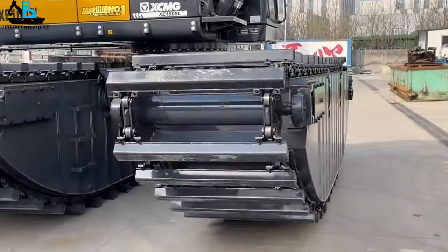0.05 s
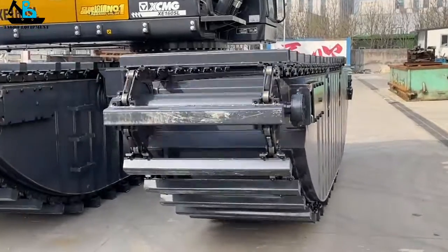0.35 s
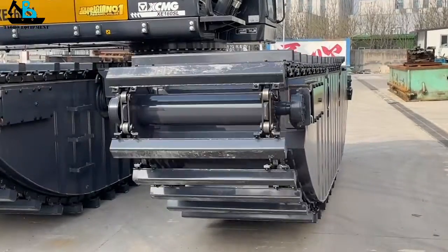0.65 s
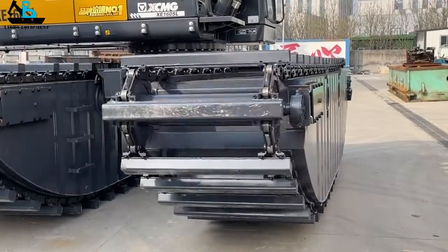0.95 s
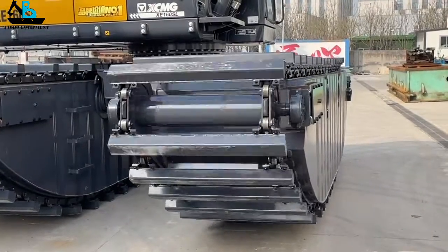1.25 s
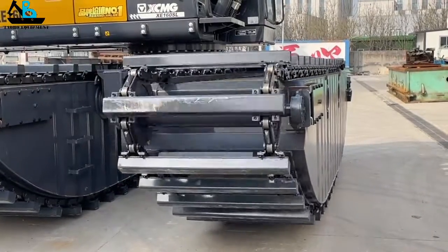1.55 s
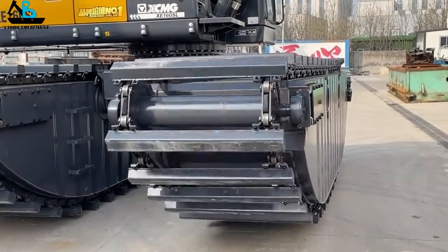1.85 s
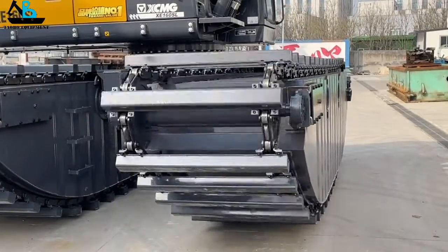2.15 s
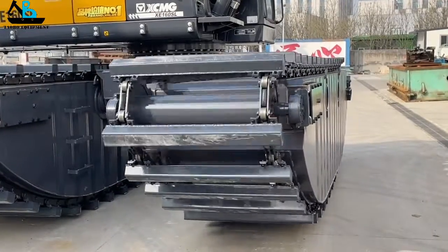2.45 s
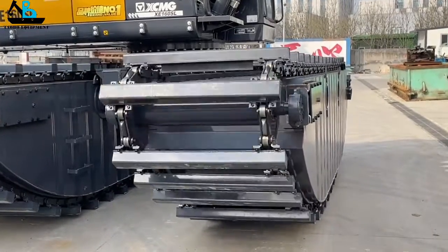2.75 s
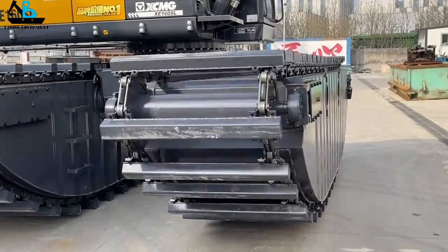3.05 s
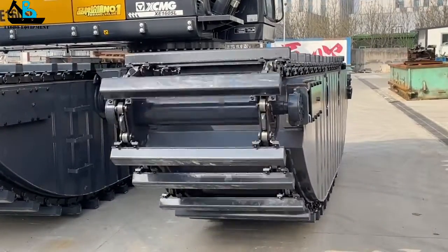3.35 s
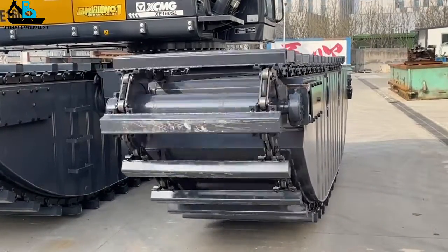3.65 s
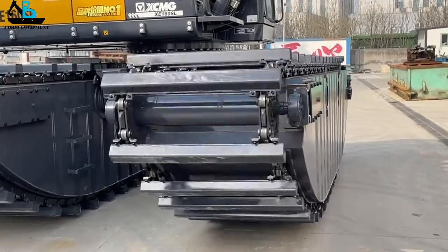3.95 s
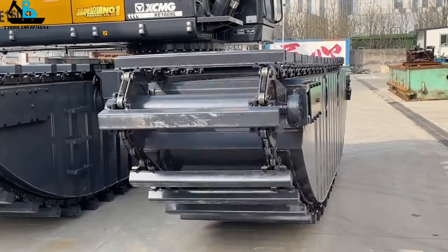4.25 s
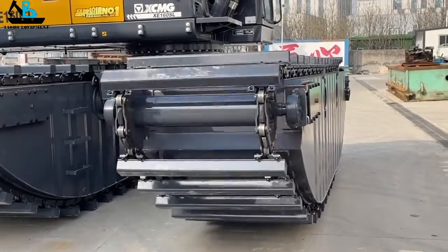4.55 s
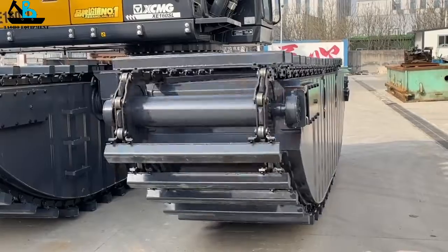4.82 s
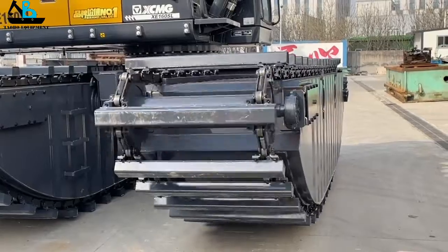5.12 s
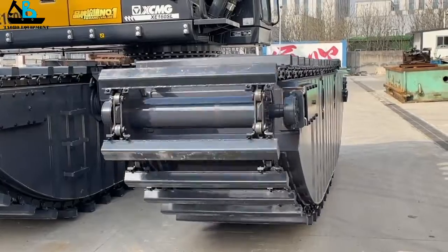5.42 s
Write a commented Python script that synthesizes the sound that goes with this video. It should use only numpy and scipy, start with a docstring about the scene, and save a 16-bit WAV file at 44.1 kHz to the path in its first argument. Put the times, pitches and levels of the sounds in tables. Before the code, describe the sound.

Steel track links clatter and clank continuously at close range, with hollow booms and a steady diesel engine underneath.

```python
"""Amphibious excavator on concrete

Heard from beside one pontoon track. The diesel drones at a steady speed under the rush of its fan.
Links and steel cleats clank over the sprocket about seven times a second, rattle and rasp along
their guides and make the hollow pontoon rumble and boom. Pins ring and squeak; grit cracks in the steel."""
import sys
import numpy as np
from scipy import signal
from scipy.fft import rfft, irfft, next_fast_len
from scipy.io import wavfile

SR = 44100
rng = np.random.default_rng(int(sys.argv[2]) if len(sys.argv) > 2 else 0)


def transcribe(u):
    """Save the signal u as a 16-bit wav file named by the first command-line argument.

    u: samples, shape (n,) or (channels, n), limited to [-1, 1]; the rate is SR.
    q: integer samples, one column per channel.
    """
    v = np.clip(np.atleast_2d(u).T, -1, 1)
    q = np.round(v * 32767).astype(np.int16)
    wavfile.write(sys.argv[1], SR, q)


N = 246078
TIME = np.arange(N) / SR


def from_db(db):
    return 10 ** (np.asarray(db) / 20)


def rms_one(x):
    return x / np.sqrt(np.mean(x ** 2) + 1e-20)


def in_time(curve):
    """A level curve, sample by sample."""
    return np.interp(TIME, *np.transpose(curve))


def at_hz(points, hz):
    """Read a table on a log-frequency axis."""
    freqs, values = np.transpose(points)
    return np.interp(np.log(hz), np.log(freqs), values)


def filtered(x, hz, kind, order=2):
    """Butterworth filter."""
    return signal.sosfilt(signal.butter(order, np.clip(hz, 10, .45 * SR), kind, fs=SR, output="sos"), x)


def add(out, s, sound):
    """Mix a sound in at time s."""
    start = int(np.clip(s * SR, 0, N - 1))
    out[..., start:start + sound.shape[-1]] += sound[..., :N - start]


def drift(rate_hz):
    """Smooth random modulation of spread 1."""
    pole = np.exp(-80 * np.pi * rate_hz / SR)
    slow = signal.lfilter([1], [1, -2 * pole, pole * pole], rng.standard_normal(N // 40 + 2002))[2000:]
    return np.interp(np.arange(N) / 40, np.arange(len(slow)), rms_one(slow))


def contacts(per_s, spread_db, size):
    """Random touches of uneven strength."""
    strength = from_db(spread_db * np.minimum(rng.exponential(1, size), 4))
    return (rng.random(size) < per_s / SR) * strength * rng.choice([-1, 1], size)


def ringing(modes, t, pitch=1):
    """Struck modes, tuned by pitch, die away; neighbours start in opposite directions."""
    return sum((-1) ** k * from_db(db - 60 * t / t60) * np.sin(2 * np.pi * pitch * f * t)
               for k, (f, db, t60) in enumerate(modes))


# Stereo width of the noise: f/Hz, side minus mid/dB
STEREO_WIDTH = [(60, -25), (250, -17), (700, -15), (1400, -11), (2500, -20), (4500, -24), (6500, -17),
                (10000, -14)]
def noise_bands(spectrum, size):
    """Stereo noise in bands of 0.4 octave across a spectrum: yields (Hz, band)."""
    edges = 28 * 2 ** np.arange(0, 9.3, .4)
    white = rng.standard_normal((2, 2, size + SR // 10))
    for k, (low, high) in enumerate(zip(edges, edges[1:])):
        if high > spectrum[0][0] and low < spectrum[-1][0]:
            hz = np.sqrt(low * high)
            mid, side = filtered(white[k % 2], [low, high], "band")[:, -size:]
            width = from_db(at_hz(STEREO_WIDTH, hz))
            yield hz, from_db(at_hz(spectrum, hz)) * (mid + width * side * [[1], [-1]])


def noise(spectrum):
    """Steady coloured noise of rms 1."""
    return rms_one(sum(band for hz, band in noise_bands(spectrum, N)))


# The low drone wavers in level: t/s, relative level/dB
DRONE_RIDE = [(0, -20.5), (.45, -18), (.82, -17.5), (1.0, -15), (1.2, -28), (1.32, -14.5), (1.6, -16),
              (1.88, -18.5), (2.05, -22), (2.25, -22), (2.4, -15), (2.8, -23), (3.05, -17), (3.3, -32),
              (3.55, -19.5), (3.72, -18.5), (3.98, -18), (4.2, -23), (4.5, -22), (4.66, -18), (4.85, -25),
              (5.1, -23), (5.58, -15.5)]
# Engine and pump tones above it: multiple of the crankshaft rate, level/dB
ENGINE_ORDERS = [(8, -38), (9, -34), (12, -34), (14, -34), (16, -33), (19.3, -35), (26.27, -35.5),
                 (28.4, -38)]
def diesel(firing_hz, firings_per_turn, gain_db, wander_hz, uneven_db):
    """The governed engine: a strong firing tone and weaker, unsteady orders; also gives its phase."""
    phase = 2 * np.pi * np.cumsum(firing_hz + wander_hz * drift(7.3)) / SR
    tone = from_db(in_time(DRONE_RIDE) + gain_db) * np.sin(phase)
    for multiple, db in ENGINE_ORDERS:
        level = from_db(db + uneven_db * drift(4.7))
        tone += level * np.sin(multiple * phase / firings_per_turn + rng.uniform(0, 2 * np.pi))
    return np.sqrt(2) * tone, phase


# Colour of the fan: f/Hz, density/dB
FAN_SPECTRUM = [(500, 25), (1000, -13), (1400, 17.5), (2200, 9.5), (3200, 4), (5000, -6), (7000, -55)]
def fan(firing_phase, level_db):
    """The engine bay's rush pulses a little with each firing."""
    return from_db(level_db) * noise(FAN_SPECTRUM) * (1 + 0.086 * np.cos(firing_phase))


CLEAT_PERIOD_S, FIRST_CLEAT_S, LINK_SHARE = .279, .245, 0.17
def chain_load(lead_s=0):
    """The pull on the chain peaks with each cleat; the link between two cleats adds a second harmonic."""
    turn = 2 * np.pi * (TIME + lead_s - FIRST_CLEAT_S) / CLEAT_PERIOD_S
    return np.cos(turn) + LINK_SHARE * np.cos(2 * turn)


# Colour of the pontoon's rumble: f/Hz, density/dB
RUMBLE_SPECTRUM = [(30, -30), (40, -24), (52, 5), (66, -4), (80, 2.5), (98, 2.5), (122, -3), (165, 3.5),
                   (230, -0.5), (320, -5.5), (480, -12), (800, -17), (1500, -23.5), (4000, -73)]
# It grows and eases: t/s, relative level/dB
RUMBLE_RIDE = [(0, -1), (.15, -1), (.3, -1), (1.1, 0), (1.6, -1.5), (1.95, -1), (2.6, -0.5), (3.1, -0.5),
               (3.95, 0.5), (4.17, 0), (4.27, -2.5), (4.55, -1.5), (4.72, -1), (4.88, -1), (5.0, -1.5),
               (5.17, -2), (5.3, -1.5), (5.58, -1.5)]
def pontoon_rumble(level_db, swing_db):
    """The running track keeps the hollow pontoon rumbling."""
    level = from_db(level_db + in_time(RUMBLE_RIDE) + swing_db * chain_load())
    return level * filtered(noise(RUMBLE_SPECTRUM), 41.4, "high", order=4)


# Colour of struck track steel: f/Hz, density/dB
STEEL_SPECTRUM = [(250, 14), (400, 3.5), (580, 4), (850, 5.5), (1200, -0.5), (1650, -0.5), (1950, 1),
                  (2700, -7), (3300, -8), (4300, -16.5), (6000, -17), (7500, -41), (10000, -10),
                  (15000, -20)]
# Its ring time: f/Hz, t60/s
STEEL_DECAY = [(300, 0.21), (1000, 0.12), (3000, 0.16), (6000, 0.21), (12000, 0.077)]
# Clear modes shared by cleats and pins: f/Hz, level/dB, t60/s
STEEL_MODES = [(533, -5, .35), (590, -7, .25), (790, -13, .15), (1260, -11, .12), (1470, -8, .08),
               (1830, -3, .045), (1930, -2, .04), (2610, -11, .08), (2854, -13, .12), (3305, -11.5, .1),
               (4537, -14, .16), (5140, -20, .15), (6320, -21, .05)]
def steel_ring(modes_db, clink_hz):
    """One track part, touched once: crowded plate modes, a few clear ones and a clink of its own."""
    t = TIME[:SR // 4]
    crowd = sum(band * from_db(-60 * t / at_hz(STEEL_DECAY, hz))
                for hz, band in noise_bands(STEEL_SPECTRUM, len(t)))
    clink = (clink_hz * (1 + .02 * rng.standard_normal()), 3 * rng.standard_normal(), .025)
    clear = sum(from_db(db - 60 * t / t60) * np.sin(2 * np.pi * hz * t) * rng.choice([-1, 1])
                for hz, db, t60 in STEEL_MODES + [clink])
    return rms_one(crowd) + from_db(modes_db) * clear


# The rattle comes and goes: t/s, relative level/dB
RATTLE_RIDE = [(0, 4), (.2, -2), (.8, 0), (1.15, -5.5), (1.45, -0.5), (2.15, -4), (2.6, -2.5), (3.1, 1.5),
               (3.7, -4.5), (4.35, -3.5), (5, 0), (5.58, 0.5)]
def chain_rattle(parts, level_db, swing_db):
    """Rollers and loose pins knock all along the chain, harder under load."""
    knocks, preroll = np.zeros((2, N)), SR // 4
    for part in parts:
        touches = contacts(per_s=160, spread_db=5, size=N + preroll)
        knocks += signal.fftconvolve(part, touches[None], axes=1)[:, preroll:N + preroll]
    level = from_db(level_db + in_time(RATTLE_RIDE) + swing_db * chain_load())
    return level * rms_one(filtered(filtered(knocks, 390, "high"), 6400, "low"))


# Friction of cleats on their guides: t/s, relative level/dB
SLIDE_RIDE = [(0, -0.5), (.8, 1), (1.2, 2), (1.6, 2.5), (2.2, 2.5), (2.9, 3), (3.7, 3.5), (4.12, 6),
              (4.25, -0.5), (4.55, 0), (4.75, 0.5), (5.2, 2.5), (5.58, 1)]
def sliding_db():
    """The cleats scrape hardest just before the load peaks."""
    return in_time(SLIDE_RIDE) + 1.5 * chain_load(lead_s=0.086)


# Colour of the sliding steel: f/Hz, density/dB
HISS_SPECTRUM = [(2500, 5), (4200, -17), (5400, 21), (6300, 0), (7500, -2), (9300, -20.5), (11500, -5.5),
                 (15500, -9)]
def guide_hiss(level_db, wander_db):
    """Sliding cleats hiss, unevenly from moment to moment."""
    return from_db(level_db + sliding_db() + wander_db * drift(40)) * noise(HISS_SPECTRUM)


# Pitches of the fine ticks: f/Hz, level/dB, t60/s
TICK_PITCHES = [(4540, -2, .03), (5140, 0, .02), (5750, 2, .008), (6320, 3, .012), (6900, 1, .005),
                (9900, -6, .003), (10650, -9, .015), (11540, -7, .008), (12400, -7, .003)]
def fine_ticks(level_db, per_s):
    """Fine, high, pitched ticks in the hiss."""
    ticks, t = np.zeros(N), TIME[:SR // 20]
    for mode in TICK_PITCHES:
        onsets = contacts(per_s / len(TICK_PITCHES), spread_db=2.5, size=N)
        ticks += signal.fftconvolve(onsets, ringing([mode], t))[:N]
    return from_db(level_db + sliding_db()) * rms_one(ticks)


# Slack cleats and links slam home: t/s, force/dB, hardness/dB, thud into the plate/dB, rattle decay/s
SLAMS = [(0.002, -32, -12, 12, 0.024), (0.055, -33.5, -14, 14, 0.015), (0.218, -31.5, -20, 12.5, 0.014),
         (0.254, -24.5, -3, -3, 0.026), (0.270, -28, 0.5, 5, 0.063), (0.358, -34.5, -27, 7, 0.02),
         (0.453, -30.5, -3, -8, 0.018), (0.490, -32.5, -2, -3, 0.018), (0.506, -30, 3, 1.5, 0.04),
         (0.642, -24, -4, 3.5, 0.04), (0.777, -30, -2, 7.5, 0.032), (1.009, -33, -0.5, -2, 0.03),
         (1.037, -28, -9, 4.5, .05), (1.200, -30, -4, -6, .009), (1.329, -27, -5, -13, 0.014),
         (1.423, -29, -1.5, 2, 0.035), (1.468, -31, -4, -16, 0.017), (1.575, -22.5, -1.5, -10, 0.006),
         (1.632, -29.5, -7, 6, 0.083), (1.851, -27, -3, 7.5, 0.2), (1.888, -21.5, 4.5, 1, 0.019),
         (1.906, -22.5, 3, -5, 0.024), (2.015, -29, -1, 6, 0.028), (2.182, -31, 1, -17, 0.024),
         (2.307, -28, 1, 8, 0.036), (2.460, -36.5, 7.5, -4, 0.028), (2.763, -29.5, -6, 10, 0.013),
         (2.860, -30.5, 2, 3, 0.056), (2.962, -37, -9, -2, .012), (3.017, -27.5, -10, 7.5, 0.068),
         (3.033, -24.5, 5, 5, 0.027), (3.130, -32, 5, 6, 0.066), (3.245, -32.5, -2, -4, 0.06),
         (3.318, -25, -3.5, 2, 0.033), (3.422, -30.5, -1.5, -5, 0.039), (3.479, -29.5, -4, -8, 0.0053),
         (3.573, -23, -0.5, -1.5, 0.059), (3.598, -23, 0, 2.5, 0.071), (3.784, -28, -2, 5, 0.016),
         (3.845, -34, 4, 11.5, 0.053), (4.038, -30, -9, 4, 0.033), (4.136, -27.5, -4, 0, 0.027),
         (4.150, -26.5, 6.5, -9, 0.012), (4.157, -21.5, -3, 6, 0.024), (4.176, -27.5, -10, 8, 0.02),
         (4.408, -28, 1, 11.5, 0.029), (4.695, -26.5, -4, 3, 0.014), (4.709, -28.5, -4, 8, 0.053),
         (4.865, -26.5, 1.5, 1, .014), (4.958, -25, -1, 0, 0.044), (4.996, -27.5, -6, 6.5, 0.037),
         (5.105, -31, -8, -6, 0.02), (5.195, -33, -1, 12, 0.024), (5.226, -30.5, 1.5, -4, 0.019),
         (5.368, -34, 6.5, -6, 0.037), (5.555, -30, -2.5, -5.5, .03)]
# Plate, cleat, link and pin registers: low/Hz, high/Hz, share of hardness, of thud, of heaviness
BLOW_REGISTERS = [(330, 750, 0, 1, .7), (750, 1300, -.5, 0, 2), (1300, 3700, 0, 0, 0),
                  (3700, 6800, 1, 0, 0)]
# How each register answers: level/dB, factor on the rattle decay
REGISTER_RESPONSES = [(-4, 2.1), (-2, 1.58), (1.06, 0.74), (-8, 0.47)]
def clanks(parts, seats, bounce_db):
    """Slams and seating knocks bounce and die; a hard blow rings the pin, a heavy one the cleat."""
    out, t = np.zeros((2, N)), TIME[:SR // 5]
    registers = [[filtered(part, [low, high], "band", order=3) for low, high, *_ in BLOW_REGISTERS]
                 for part in parts]
    for k, (s, force_db, hardness_db, thud_db, rattle_s) in enumerate(SLAMS + seats):
        bounces = from_db(bounce_db) * contacts(per_s=1000, spread_db=2.5, size=len(t))
        heaviness_db = 0.24 * max(force_db + 28.5, 0)   # heavy above -28.5 dB
        voices = zip(registers[k % len(parts)], BLOW_REGISTERS, REGISTER_RESPONSES)
        for ring, (_, _, hard, thud, heavy), (db, longer) in voices:
            force = bounces * np.exp(-t / max(rattle_s * longer, 1e-3))
            force[0] = 1   # the blow itself
            blow = signal.fftconvolve(ring, force[None], axes=1)
            level_db = force_db + db + hard * hardness_db + thud * thud_db + heavy * heaviness_db
            add(out, s, from_db(level_db) * blow / np.std(blow[:, :SR // 30]))
    return out


def seating_knocks(force_db, hardness_db, thud_db, rattle_s, lead_s, scatter_s):
    """Every link seats on the sprocket with a light knock, just ahead of the load: rows as in SLAMS."""
    links = np.arange(-1, 2 * N / SR / CLEAT_PERIOD_S - 1)
    beats = FIRST_CLEAT_S - lead_s + links * CLEAT_PERIOD_S / 2
    return [(s + scatter_s * late, force_db + accent_db, hardness_db, thud_db, rattle_s)
            for s, (late, accent_db) in zip(beats, rng.standard_normal((len(beats), 2)))]


# A cleat rasps along its guide: t/s, length/s, relative level/dB
RASPS = [(0.16, 0.09, -44), (2.271, 0.046, -43), (2.551, 0.11, -38.5), (2.678, 0.057, -39),
         (3.235, .07, -41.5), (4.06, .04, -44), (5.324, .05, -41), (5.458, 0.047, -39.5)]
# Resonances under the rasp: f/Hz, level/dB, t60/s
RASP_MODES = [(3600, -6, .004), (4750, -4, .004), (5140, -6, .012), (5350, 0, .009), (5680, 0, .006),
              (6280, -1, .009)]
def cleat_rasps(gain_db):
    """Dense little slips swell and fade in the high resonances of a cleat."""
    out, ring = np.zeros(N), ringing(RASP_MODES, TIME[:SR // 30])
    for s, length_s, db in RASPS:
        size = int(length_s * SR)
        slips = contacts(per_s=790, spread_db=0.5, size=size) * np.sqrt(np.hanning(size))
        rasp = signal.fftconvolve(slips, ring)
        add(out, s, from_db(db + gain_db) * rasp / (np.std(rasp[:size]) + 1e-9))
    return out


# Booms under the heaviest cleats: t/s, relative peak/dB, f/Hz
PONTOON_BOOMS = [(0.23, -6, 143), (0.503, -3, 174.3), (0.67, -10.5, 193), (0.839, -13, 167),
                 (1.088, -9, 153), (1.342, -5.5, 180.4), (1.865, -7, 149), (2.025, -4, 132.5),
                 (3.058, -5, 190), (3.339, -9, 109), (3.594, -3.5, 180), (4.14, -6.5, 161),
                 (4.406, -5, 163), (4.71, -3.5, 147), (5.0, -10, 204), (5.27, -8, 162.5)]
def pontoon_booms(gain_db, t60, swell_s):
    """The air-filled steel box swells and rings for a few cycles."""
    out, t = np.zeros(N), TIME[:SR // 3]
    shape = (1 - np.exp(-t / swell_s)) * from_db(-60 * t / t60)
    for s, db, hz in PONTOON_BOOMS:
        add(out, s, from_db(db + gain_db) * shape / shape.max() * np.sin(2 * np.pi * hz * t))
    return out


# Dry pins squeak: t/s, length/s, start f/Hz, end f/Hz, level/dB
PIN_SQUEAKS = [(0.617, .03, 3450, 3380, -36), (1.195, .11, 2330, 2050, -33),
               (4.085, .04, 12050, 11950, -47), (4.701, .022, 4250, 4100, -37)]
def pin_squeaks(jitter_hz, rough_db):
    """Stick and slip in a hinge: a short, rough, gliding tone."""
    out = np.zeros(N)
    for s, length_s, first_hz, last_hz, db in PIN_SQUEAKS:
        size = int(length_s * SR)
        hz = np.linspace(first_hz, last_hz, size) + jitter_hz * drift(250)[:size]
        level = from_db(db + rough_db * drift(200)[:size]) * np.hanning(size)
        add(out, s, np.sqrt(2) * level * np.sin(2 * np.pi * np.cumsum(hz) / SR))
    return out


# A link pin is knocked in its bush: t/s, relative level/dB, f/Hz
PIN_KNOCKS = [(0.732, -25, 3260), (0.785, -25, 3370), (0.832, -30, 3290), (1.008, -28, 3320),
              (1.268, -29, 3310), (1.358, -32, 3290), (1.468, -26, 3380), (1.642, -30, 3850),
              (1.96, -27, 3310), (2.965, -28, 3430), (3.334, -22, 3360), (3.425, -27, 3300),
              (4.692, -20.5, 3400), (4.735, -23, 3420)]
# The pin's partials: multiple of its pitch, level/dB, t60/s
PIN_PARTIALS = [(1, 0, .04), (1.033, -2, .025), (.95, -4, .02), (.865, -7, .03), (1.1, -7, .015),
                (1.37, -16, .05)]
def pin_rings(gain_db, bounce_db, bounce_s):
    """A knock and a few quick bounces set a pin ringing."""
    out, t = np.zeros(N), TIME[:SR // 6]
    for s, db, hz in PIN_KNOCKS:
        force = from_db(bounce_db) * contacts(per_s=420, spread_db=0.5, size=len(t))
        force *= np.exp(-t / bounce_s)
        force[0] = 1
        add(out, s, from_db(db + gain_db) * signal.fftconvolve(ringing(PIN_PARTIALS, t, hz), force))
    return out


# Crunches of grit: t/s, relative level/dB
CRUNCHES = [(0.782, -46), (1.29, -47), (1.8876, -27), (2.09, -42), (2.305, -42), (2.592, -38), (2.858, -39),
            (2.893, -43), (2.9566, -41), (3.445, -44), (3.7828, -44), (4.097, -48), (4.156, -40),
            (4.8663, -41)]
def grit(gain_db, decay_s):
    """Grit cracks between steel faces in short, bright bursts."""
    out, t = np.zeros(N), TIME[:SR // 8]
    for s, db in CRUNCHES:
        crunch = rms_one(filtered(rng.standard_normal(len(t)), [5500, 12500], "band"))
        add(out, s, from_db(db + gain_db) * crunch * np.exp(-t / decay_s))
    return out


# The hardest slams meet squarely: t/s, relative bar level/dB, bar f/Hz, clang level/dB
SQUARE_HITS = [(1.2, -29.5, 2234, -39), (1.576, -9.5, 815, -30), (1.8916, -8.5, 1866, -20),
               (3.036, -20.5, 1970, -25), (3.599, -21, 2020, -19.5), (3.786, -20, 1880, -43),
               (4.157, -10, 1255, -15.5), (4.163, -16, 1910, -36), (4.187, -22, 1900, -22),
               (4.871, -24, 1740, -27)]
# The steel bar's partials: multiple of its pitch, level/dB, t60/s
BAR_PARTIALS = [(1, 0, .04), (1.4, -8, .06), (1.75, -10, .06), (2.4, -11, .11), (2.72, -15, .07)]
# Clang of the plate under it: f/Hz, level/dB, t60/s
CLANG_MODES = [(455, -4, .16), (533, -2, .25), (598, 0, .25), (715, -4, .14), (829, -3, .14), (940, -7, .1)]
def bar_cracks(gain_db, snap_db, snap_s):
    """A square hit: a brief snap, the bar's own ring and the lower clang of the plate."""
    out, t = np.zeros(N), TIME[:SR // 5]
    plate = ringing(CLANG_MODES, t)
    for s, db, hz, clang_db in SQUARE_HITS:
        burst = rms_one(filtered(rng.standard_normal(len(t)), [.6 * hz, 1.5 * hz], "band"))
        crack = ringing(BAR_PARTIALS, t, hz) + from_db(snap_db) * burst * np.exp(-t / snap_s)
        add(out, s, from_db(db + gain_db) * crack + from_db(clang_db) * plate)
    return out


def scene():
    """Engine and track, close and nearly straight ahead."""
    parts = [steel_ring(modes_db=1, clink_hz=3330) for _ in range(10)]   # no two ring quite alike
    engine, phase = diesel(firing_hz=66, firings_per_turn=6, gain_db=-2, wander_hz=0.036, uneven_db=2.5)
    engine = engine + fan(phase, level_db=-33.5)
    pontoon = pontoon_rumble(level_db=-16, swing_db=0.12)
    pontoon += pontoon_booms(gain_db=-4.5, t60=.13, swell_s=.007)
    steel = chain_rattle(parts, level_db=-28.5, swing_db=2)
    friction = guide_hiss(level_db=-47, wander_db=.7)
    seats = seating_knocks(force_db=-36, hardness_db=-10, thud_db=10, rattle_s=0.034,
                           lead_s=.022, scatter_s=.006)
    steel += clanks(parts, seats, bounce_db=-11)
    steel += bar_cracks(gain_db=0.5, snap_db=-3.5, snap_s=0.0062)
    steel += pin_rings(gain_db=-3, bounce_db=-6, bounce_s=.014)
    friction += pin_squeaks(jitter_hz=260, rough_db=4) + grit(gain_db=-2.5, decay_s=0.029)
    ticks = fine_ticks(level_db=-55, per_s=900)
    friction += cleat_rasps(gain_db=-2.5)
    lean_left = from_db([[.3], [-.3]])
    return engine + friction + ticks + (steel + pontoon) * lean_left


# The treble and a narrow band near 1.7 kHz reach the two sides out of step: f/Hz, right lead/rad
PHASE_SPREAD = [(1580, 0), (1720, -1.7), (1830, 0), (6000, 0), (7000, 1.2), (8250, 3.14), (10000, 5),
                (11500, 6.28), (13000, 7.6), (14700, 9.42), (16000, 10)]
def record(dry):
    """Spread the treble in phase, round the peaks and cut the top at 14.4 kHz."""
    size = next_fast_len(N + SR // 10)
    lead = np.interp(np.arange(size // 2 + 1) * SR / size, *np.transpose(PHASE_SPREAD))
    spread = irfft(rfft(dry, size) * np.exp(.5j * lead * [[-1], [1]]), size)[:, :N]
    rounded = spread / (1 + (spread / .97) ** 6) ** (1 / 6)
    return signal.sosfilt(signal.ellip(10, .3, 80, 14400, fs=SR, output="sos"), rounded)


dry = scene()
out = record(dry)
transcribe(out)
```